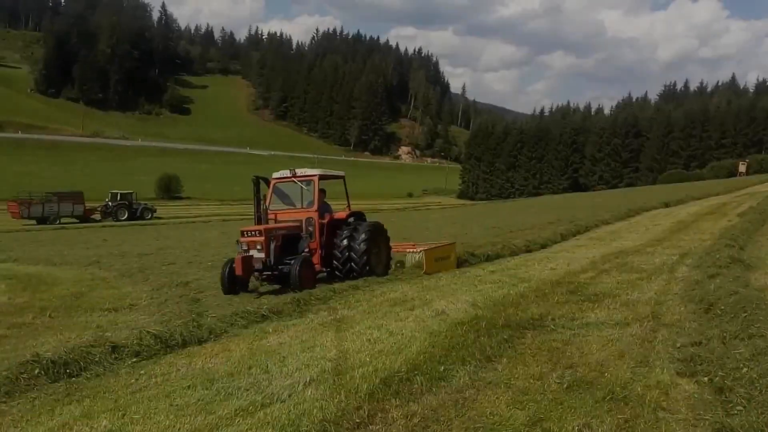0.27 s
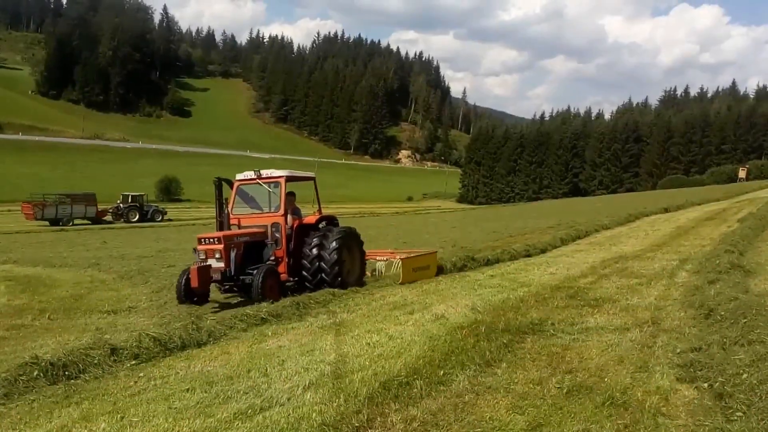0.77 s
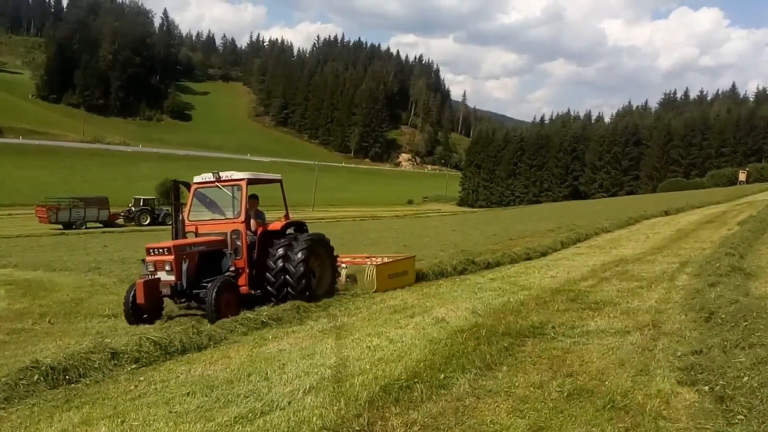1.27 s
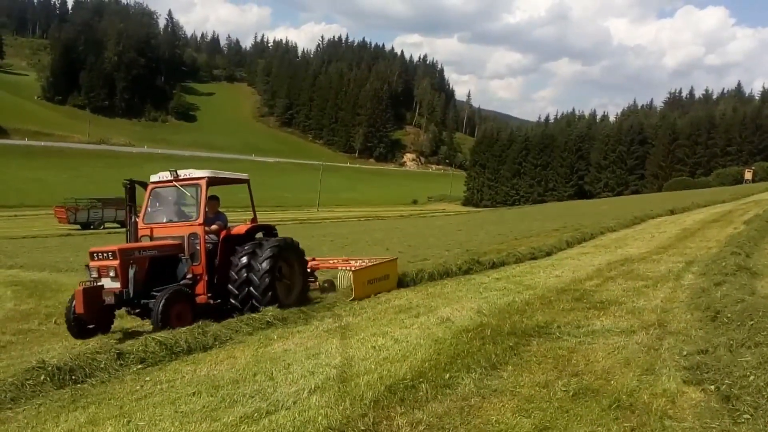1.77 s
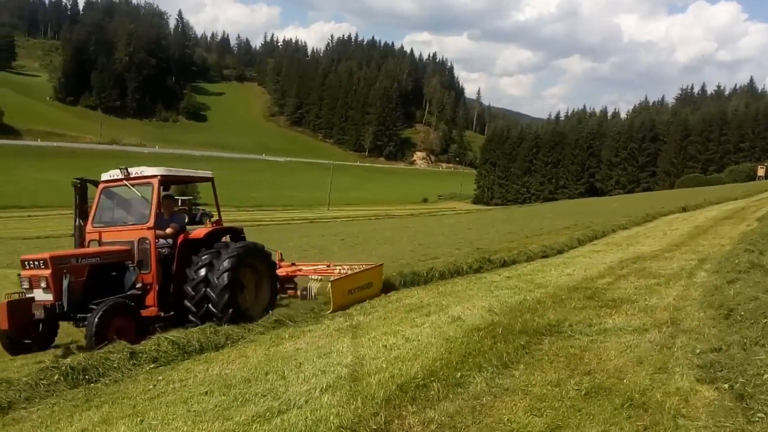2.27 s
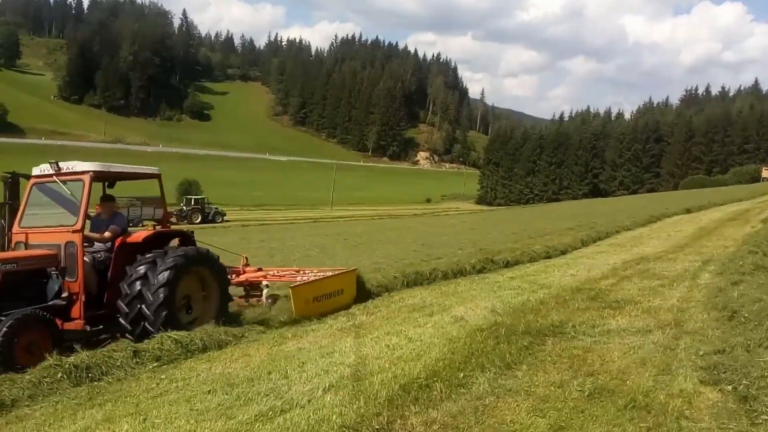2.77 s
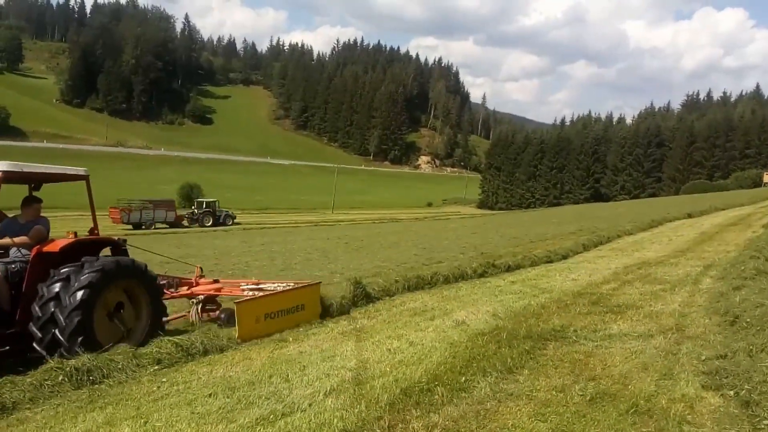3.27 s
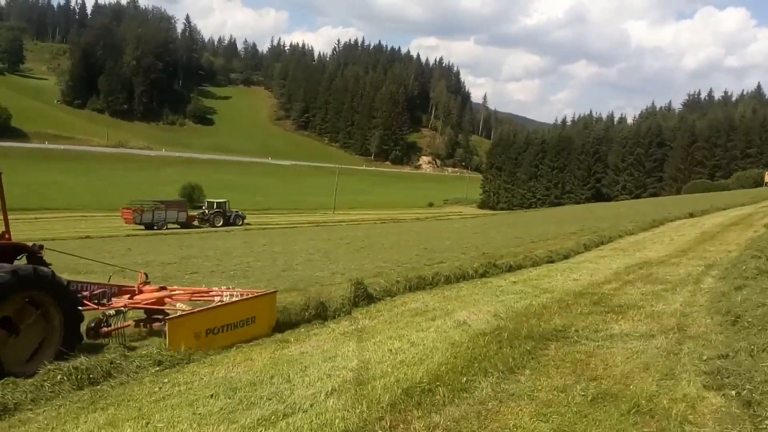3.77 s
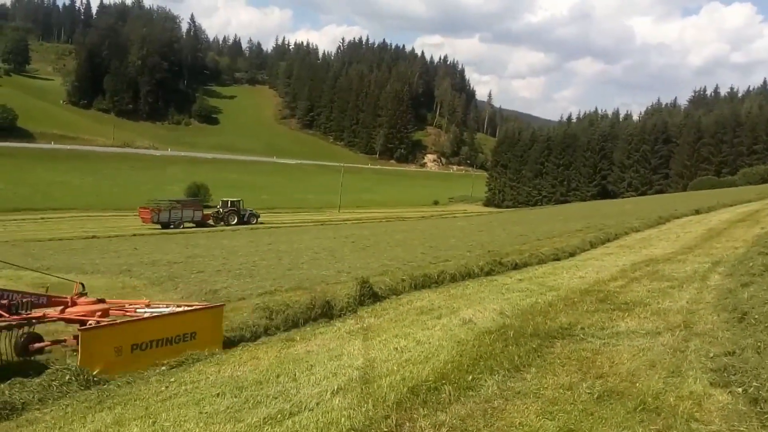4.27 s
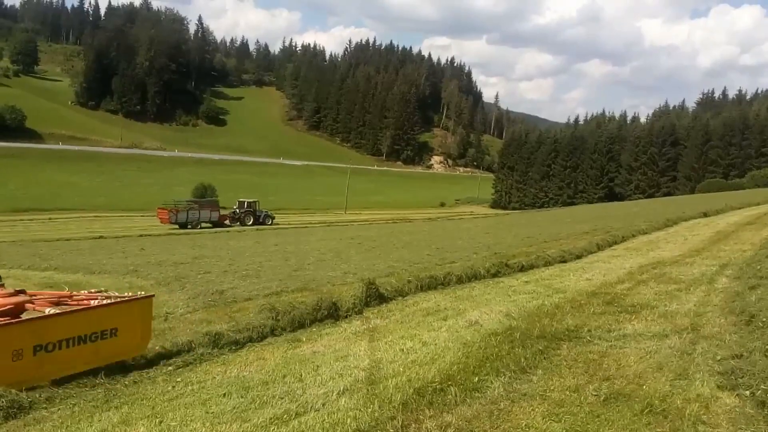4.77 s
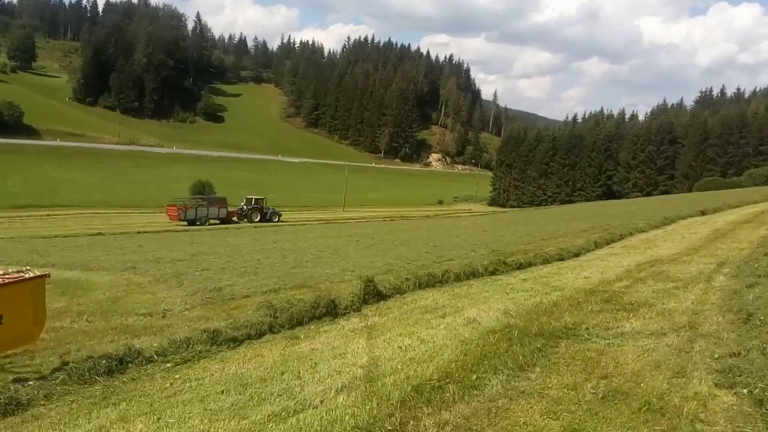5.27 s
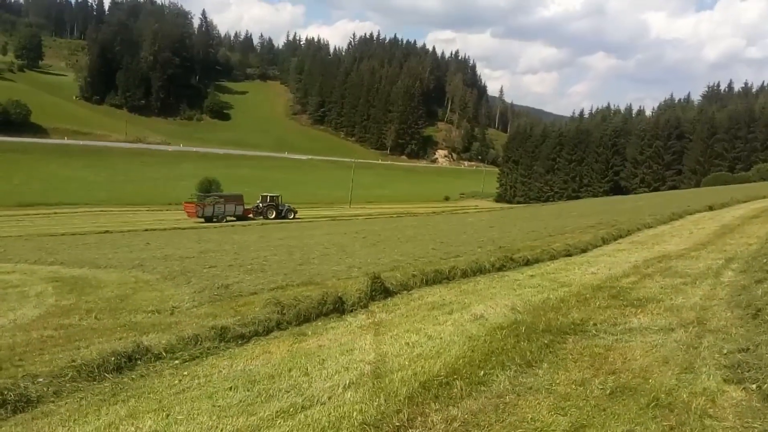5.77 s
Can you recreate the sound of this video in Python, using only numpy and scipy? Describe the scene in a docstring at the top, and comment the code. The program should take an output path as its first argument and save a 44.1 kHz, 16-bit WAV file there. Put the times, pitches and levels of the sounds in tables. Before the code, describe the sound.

An older three-cylinder diesel tractor works in an open meadow, pulling a rotary rake past a fixed stereo camera microphone. Its low exhaust drone stays nearly constant, with fast firing knocks and a broad clattering hiss from valve gear, fan and tines. A thin gear whine comes and goes. As it passes, the tone changes and the balance shifts; the treble is dull.

```python
"""In a meadow, a three-cylinder diesel tractor pulls a rotary grass rake slowly past a two-port camera.
The exhaust drones as a stack of tones tied to the engine cycle; each firing knocks the engine block.
Valve gear, fan and tines hiss as shaped noise, and a gear whines as one tone that comes and goes.
The ground adds a late copy; as the tractor moves aside the left port hears it later and the colours shift."""
import sys
import numpy as np
from scipy import signal
from scipy.fft import rfft, irfft, next_fast_len
from scipy.io import wavfile
from scipy.ndimage import uniform_filter1d, map_coordinates

SR = 44100
rng = np.random.default_rng(int(sys.argv[2]) if len(sys.argv) > 2 else 0)


def boost(x):
    """Linear amplitude factor 10**(x/20) for a level x in decibels (scalar or array-like)."""
    u = np.asarray(x, float) / 20
    return 10 ** u


def unload_audio(sound):
    """Save the sound as a 16-bit wav file, at the path given as the first command line argument."""
    columns = np.transpose(np.atleast_2d(sound))
    # keep every value between -1 and 1, then stretch to whole-number steps
    steps = np.round(np.clip(columns, -1, 1) * 32767)
    wavfile.write(sys.argv[1], SR, steps.astype(np.int16))


N = 264952  # length in samples
WINDOW = dict(nperseg=1024, noverlap=768)  # samples, for the short-time spectra


def unit(x):
    """Scaled to rms 1."""
    return x / np.sqrt(np.mean(x ** 2) + 1e-20)


def along(points, hz):
    """Each column after the frequency, read at hz on a log axis."""
    f, *columns = np.transpose(points)
    return [np.interp(np.log(hz + 1), np.log(f + 1), c) for c in columns]


def curves(rows, t):
    """Each column after the time, read at times t."""
    s, *columns = np.transpose(rows)
    return [np.interp(t, s, c) for c in columns]


def wobble(rate):
    """A smooth random curve with rate knots a second."""
    knots = rng.standard_normal(int(N * rate / SR) + 4)
    return map_coordinates(knots, [np.arange(N) * rate / SR])


def swing(t):
    """Near 0 while the tractor approaches, near 1 once it has gone by."""
    pass_s, pass_takes_s = 4.21, 0.73  # when it is beside the camera, and how fast it swings by
    return 1 / (1 + np.exp((pass_s - t) / pass_takes_s))


def path(t):
    """How far the tractor is turned away (0-1), and how many ms later the left port hears it."""
    away_ahead, away_passed = 0.12, 0.84
    away = away_ahead + (away_passed - away_ahead) * swing(t)
    lag_ms = 0.043 + 0.04 * t + 0.18 * swing(t)  # grows all the time, fastest as it swings by
    return away, lag_ms


# Engine speed, never quite steady because the governor hunts: time_s, firing_rate_hz
ENGINE_SPEED = [(0.0, 45.03), (0.4, 45.888), (0.6, 45.633), (0.8, 46.39), (1.4, 45.856), (2.0, 46.595),
                (2.6, 45.953), (3.2, 46.436), (3.4, 46.204), (3.8, 46.311), (4.0, 46.111), (4.2, 46.242),
                (5.0, 45.276), (5.4, 46.371), (6.01, 45.601)]


def cycles():
    """Four-stroke cycles passed so far: the running sum of engine speed, three firings to a cycle."""
    firing_rate_hz, = curves(ENGINE_SPEED, np.arange(N) / SR)
    return .942 + np.cumsum(firing_rate_hz) / (3 * SR)


def clatter(keep):
    """Noise locked to the crankshaft: each cycle keeps most of the last one's pattern."""
    size = 2870  # noise points per cycle
    fresh = rng.standard_normal((3, int(cycles()[-1]) + 30, size))
    # the first 25 cycles only let the pattern settle
    pattern = signal.lfilter([1], [1, -keep], fresh, axis=1)[:, 25:].reshape(3, -1)
    return unit(np.array([map_coordinates(p, [cycles() * size]) for p in pattern]))


# How strongly the turf sends sound back: pitch_hz, share_ahead (0-1), share_passed (0-1)
TURF_REFLECTION = [(302, 1, 1), (775, 0.76, 0.33), (1720, 0.75, 0.28), (2960, 0.51, 0.45),
                   (5450, 0.38, 0.29), (8000, 0.25, 0.22)]


def echo(hz, away, first, second, third):
    """The turf's copy, half a turn out of step at each dip; later dips keep the last spacing."""
    turns = np.minimum(hz / first, 1) / 2 + np.clip((hz - first) / (second - first), 0, 1)
    turns = turns + np.maximum(hz - second, 0) / (third - second)
    ahead, passed = along(TURF_REFLECTION, hz)
    strength = np.clip(ahead + away * (passed - ahead), 0, 1)
    return strength * np.exp(-2j * np.pi * turns)


# Where the ground echo cancels the direct sound, left port then right port;
# three dips each: dip_ahead_hz, dip_passed_hz
ECHO_DIPS = [
    [(640, 780), (1790, 3220), (2680, 4420)],
    [(570, 730), (1660, 2390), (2680, 3290)],
]
# How late each port's dips move, left then right: power of the swing (no unit)
DIP_LATENESS = [1.03, 5.3]
# How unlike the sound is at the two ports: pitch_hz, unlike_share (0-1, of amplitude)
PORT_SCATTER = [(60, 0.33), (250, 0.12), (600, 0.13), (1500, 0.25), (2300, .36), (3000, 0.46), (5000, 0.52),
                (6500, .72), (9000, 0.75)]
# Left port's level minus the right's: pitch_hz, difference_ahead_db, difference_passed_db
PORT_BALANCE = [(100, 7, -7), (290, 1.5, -6), (513, -5.5, 1), (980, -0.5, 1.5), (1430, -5.5, -10.5),
                (2550, -1.7, -0.2), (3330, 3.5, -8), (4300, 4, -8), (7200, -0.5, -5.5), (9300, 0, -9),
                (13000, -8, -21)]


def meadow(z, hz, t):
    """Direct sound plus ground echo at each port; z holds one shared and two unrelated spectra."""
    away, lag_ms = path(t)
    left, right = [[ahead + (passed - ahead) * swing(t) ** late for ahead, passed in port]
                   for port, late in zip(ECHO_DIPS, DIP_LATENESS)]
    half_lag = np.exp(-1j * np.pi * hz * lag_ms / 1000)  # half the delay left, half the lead right
    scatter = np.clip(along(PORT_SCATTER, hz)[0], 0, 1)
    ahead_db, passed_db = along(PORT_BALANCE, hz)
    tilt_db = (ahead_db + away * (passed_db - ahead_db)) / 2
    echoes = np.array([echo(hz, away, *left), echo(hz, away, *right)])
    shared = np.sqrt(1 - scatter ** 2) * z[0] * (1 + echoes) * [half_lag, 1 / half_lag]
    scattered = scatter * z[1:] * np.sqrt(1 + abs(echoes) ** 2)  # fills the dips
    ports = (shared + scattered) * boost([tilt_db, -tilt_db])
    return signal.istft(ports, SR, **WINDOW)[1][:, :N]


# Share of the noise power given to the crank-locked part, before part levels: pitch_hz, share (0-1)
LOCKED_SHARE = [(300, .3), (500, .8), (1500, .85), (2400, .7), (3000, .3), (6000, .15)]
# The rake's tines, before the hiss colour: time_s, level_db, bright_band_hz, bright_lift_db
RAKE_TINES = [(0, -30.5, 4700, -1), (.7, -31, 4700, -1), (1.3, -28.5, 4700, 2), (2.5, -28.5, 4840, 6),
              (3.3, -29, 4700, 1.5), (3.9, -29, 5040, 2.5), (4.45, -28.5, 5000, 12), (5.1, -29, 5300, 3),
              (5.6, -28, 4900, 5.5), (6.01, -28.5, 4800, 1)]
# Relative colour of valve gear, fan, tines and body rumble: pitch_hz, colour_ahead_db, colour_passed_db
HISS_COLOUR = [(45, -6, 0.5), (86.5, 3.5, -4.5), (126, 4.5, 11.5), (265, -0.5, -1.5), (486, 4.5, 7.5),
               (1040, 0, 4), (1540, 4.5, -1), (2320, -2.5, -0.5), (3400, -0.5, -0.5), (4090, 2.5, 5),
               (4350, 6, 1.5), (5500, -2, -1), (5800, -0.5, 1), (6330, -1.5, -2), (15000, -5.5, -9.5)]


def hiss(hz, t):
    """Valve gear (crank-locked noise), fan and tines (free noise): patchy, breathing with the firings."""
    firing_db = 0.72 * np.cos(2 * np.pi * (3 * cycles() - .2))
    breath = unit(boost(firing_db + 0.18 * wobble(9) + 0.87 * wobble(30)))
    sources = breath * np.array([clatter(keep=.85), rng.standard_normal((3, N))])
    locked, free = signal.stft(sources, SR, **WINDOW)[2]
    share = along(LOCKED_SHARE, hz)[0]
    away = path(t)[0]
    valve_db = -29 + 4.5 * swing(t)  # rises once passed
    tines_db, bright_hz, lift_db = curves(RAKE_TINES, t)
    tines_db = tines_db + lift_db * np.exp(-((hz - bright_hz) / 220) ** 2)  # band half-width in Hz
    z = np.sqrt(share) * boost(valve_db) * locked + np.sqrt(1 - share) * boost(tines_db) * free
    # random patches, 5 bands high and 60 frames long, about 1 dB deep
    patches = uniform_filter1d(uniform_filter1d(rng.standard_normal(z.shape[1:]), 5, 0), 60, 1)
    ahead_db, passed_db = along(HISS_COLOUR, hz)
    colour_db = ahead_db + away * (passed_db - ahead_db)
    return z * boost(colour_db + 7 + unit(patches))


# The gear's level, before its flutter and the ground: time_s, level_db
WHINE_LEVEL = [(0, -68), (.4, -40.5), (.9, -43.5), (1.2, -48), (1.7, -50), (2, -53), (2.8, -55), (3.2, -27),
               (3.55, -47), (3.8, -35), (4, -49), (4.2, -36), (4.6, -41), (5, -48), (5.6, -51), (6.01, -40)]


def whine():
    """A gear mesh sings on a high multiple of the engine speed, coming and going."""
    tones_per_cycle = 198.3
    drift = np.cumsum(rng.standard_normal(N)) * 0.03  # phase wanders, in radians
    tone = np.sin(2 * np.pi * tones_per_cycle * cycles() + drift)
    flutter_db = 4.5 * wobble(21.1)
    return tone * boost(curves(WHINE_LEVEL, np.arange(N) / SR)[0] + flutter_db)


# How hard each cylinder knocks, before it evens out as the tractor turns away: knock_db
CYLINDER_KNOCK = [0.7, -1.2, -1.5]
# The ringing tones of the engine block: pitch_hz, width_hz, strength_db
BLOCK_RESONANCES = [(838, 62, 7), (1289, 28, 2), (1466, 76, 0), (2198, 290, -2.7), (4990, 580, -5)]
# Overall knock level, before the ground and ports: time_s, level_db
KNOCK_LEVEL = [(0, -50), (.6, -36.5), (1.5, -35.5), (2.2, -29.5), (3, -29), (4, -32.5), (5, -31.5),
               (6.01, -31)]


def knock():
    """Each firing's noise burst rings the block, much alike from cycle to cycle, and dies in some ms."""
    firing = 3 * cycles() - .08
    count = np.floor(firing).astype(int)
    t = np.arange(N) / SR
    away, level_db = path(t)[0], curves(KNOCK_LEVEL, t)[0]
    # seen from behind the cylinders sound more alike
    cylinder_db = np.array(CYLINDER_KNOCK)[count % 3] * (1 - away / 2)
    size_db = cylinder_db + 1.2 * rng.standard_normal(count.max() + 1)[count]
    since = firing % 1  # share of the firing interval gone by
    burst = boost(size_db) * (1 - np.exp(-since / 0.02)) * np.exp(-since / 0.42)
    m = next_fast_len(N + SR)
    f = np.fft.rfftfreq(m, 1 / SR)
    block = 0
    for i, (pitch_hz, width_hz, db) in enumerate(BLOCK_RESONANCES):
        damping = 1j * f * width_hz
        # neighbouring resonances have opposite signs
        block = block + (-1) ** i * boost(db) * damping / (pitch_hz * pitch_hz - f * f + damping)
    ring = irfft(rfft(burst * clatter(keep=.88), m) * block, m)[:, :N]
    return unit(ring) * boost(level_db)


# The exhaust heard from three sides, relative levels:
# tones_per_cycle (count), ahead_db, beside_db, behind_db
EXHAUST_ORDERS = [(3, -21.5, -19, -24), (4, -34, -39, -36), (5, -32, -34, -43), (6, 0.5, 0.5, 1),
                  (7, -23, -17.5, -12), (8, -24, -34, -5), (9, -1.5, -6, -19), (10, -20, -26, -69),
                  (11, -34, -14.5, -17), (12, -13.5, -6, -20), (13, -35, -17, -29), (14, -31, -22, -22),
                  (15, -12.5, -17.5, -22), (16, -23, -33, -23), (17, -25.5, -32, -34),
                  (18, -28.5, -26, -20), (19, -26, -50, -35), (20, -26.5, -47, -32),
                  (21, -31, -25.5, -12.5), (24, -34, -34.5, -36), (26, -44, -53, -40), (27, -34, -32, -42),
                  (28, -35.5, -29, -18.5), (29, -21.5, -54, -28)]


def exhaust():
    """Firing orders up to 15 waver little and share one pulse shape; all others waver more, phases random."""
    t = np.arange(N) / SR
    away, lag_ms = path(t)
    rate_hz, = curves(ENGINE_SPEED, t)
    turns = cycles() - np.outer([.5, -.5], lag_ms / 1000 * rate_hz / 3)  # left late, right early
    smear = -.029 + .04 * away  # the stack shifts the phase of its higher locked orders
    drone = 0
    for order, *side_db in EXHAUST_ORDERS:
        order = round(order)
        locked = order % 3 == 0 and order < 16  # the firing orders 3 to 15
        if locked:
            depth_db = 0.075 * order * (1 + away)
            shift = smear * (order - 3) * (order - 6)
        else:
            depth_db = 2.5
            shift = rng.uniform(0, 2 * np.pi) + 0.59 * wobble(3.044)
        gain = boost(np.interp(away, [0, .5, 1], side_db) + depth_db * wobble(7))
        drone = drone + gain * np.cos(2 * np.pi * order * turns + shift)
    level_db = -18 - 1.5 * swing(t)  # falls once passed
    return boost(level_db) * drone * boost([[-1.2], [1.1]])  # dB offset of left, right port


def scene():
    """The tractor's parts, carried over the grass to both ports."""
    hz, t, metal = signal.stft(knock() + whine(), SR, **WINDOW)
    hz = hz[:, None]
    return exhaust() + meadow(metal + hiss(hz, t), hz, t)


# The microphone's colour: pitch_hz, gain_db
MICROPHONE = [(20, -13), (33, -18), (44, -.5), (5900, -.3), (6600, -5), (7500, -17), (8200, -25),
              (10400, -24), (12000, -30), (15000, -36), (15500, -60)]


def microphone(dry):
    """The microphone favours some pitches and dulls the treble: a gain for each frequency."""
    m = next_fast_len(N + SR)
    gain_db = along(MICROPHONE, np.fft.rfftfreq(m, 1 / SR))[0]
    return irfft(rfft(dry, m) * boost(gain_db), m)[:, :N]


def roll_off(x):
    """The treble ends steeply here."""
    return signal.sosfilt(signal.butter(12, 15480, fs=SR, output="sos"), x)


def record(dry):
    """The sound at the ports passes through the microphone and the camera."""
    heard = microphone(dry)
    return roll_off(heard)


dry = scene()
out = record(dry)
unload_audio(out)
```